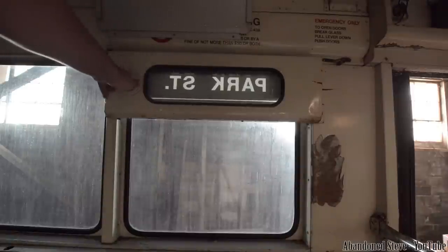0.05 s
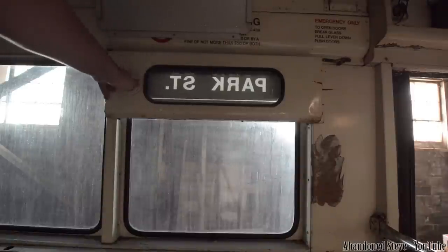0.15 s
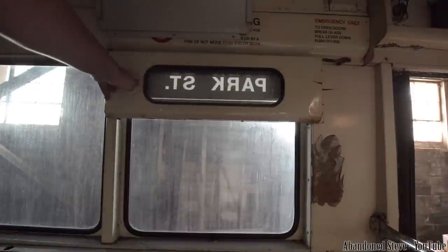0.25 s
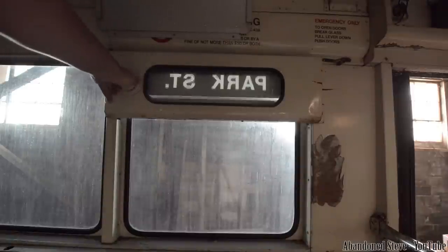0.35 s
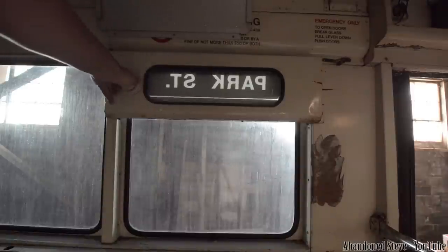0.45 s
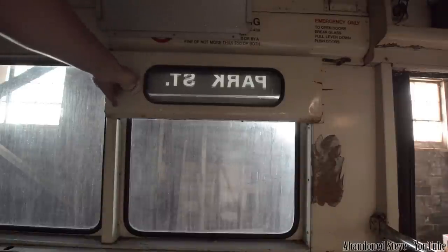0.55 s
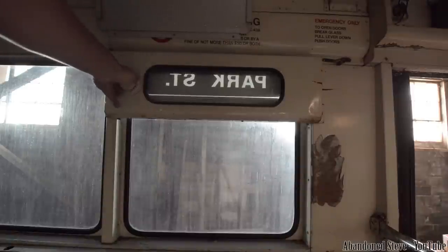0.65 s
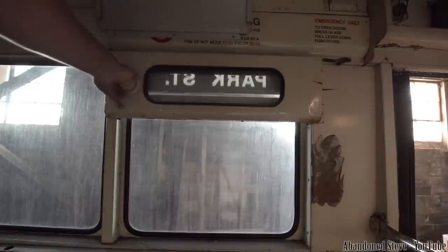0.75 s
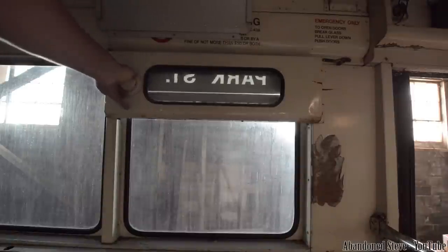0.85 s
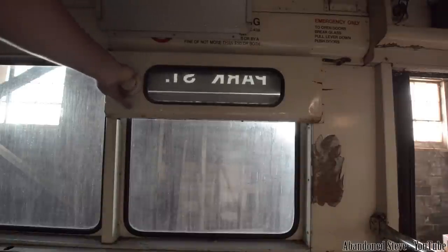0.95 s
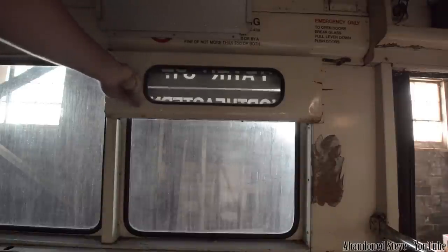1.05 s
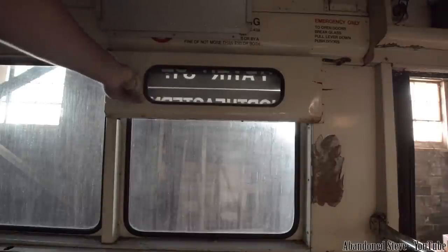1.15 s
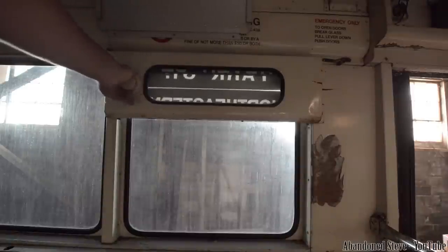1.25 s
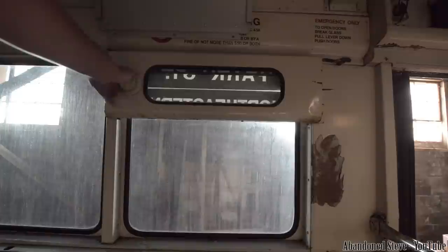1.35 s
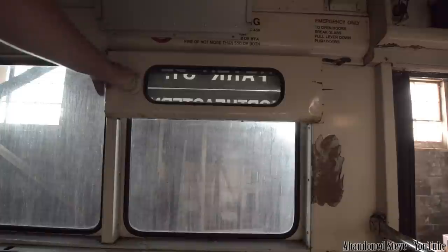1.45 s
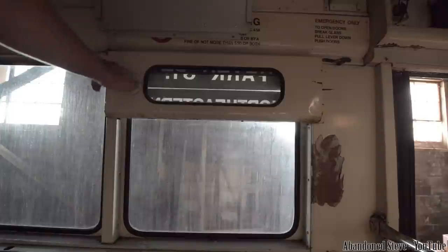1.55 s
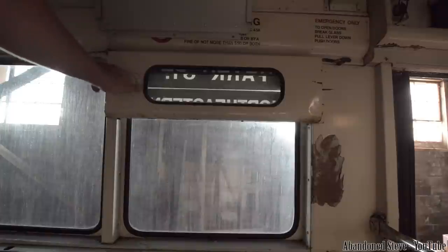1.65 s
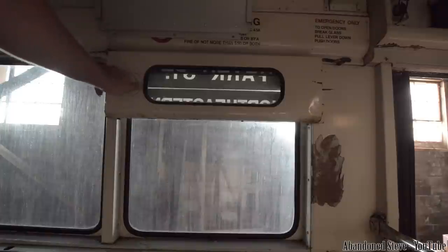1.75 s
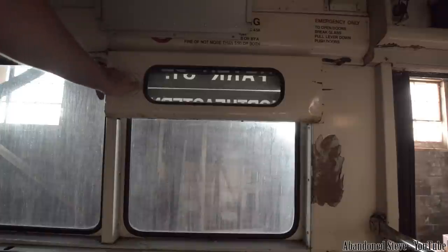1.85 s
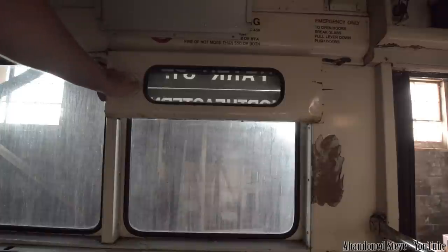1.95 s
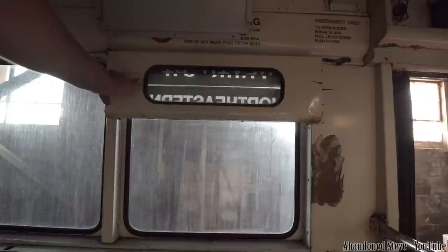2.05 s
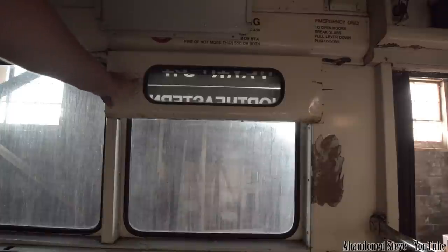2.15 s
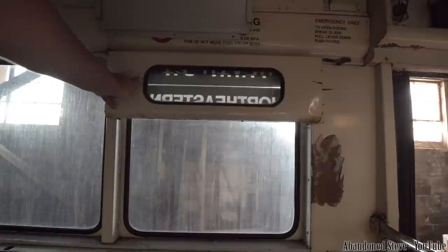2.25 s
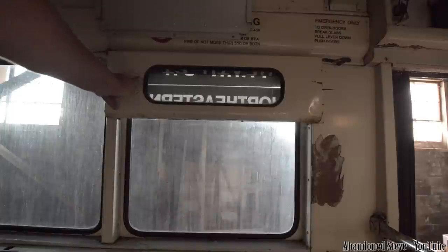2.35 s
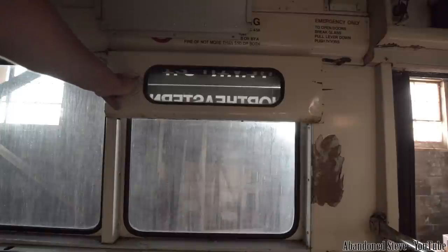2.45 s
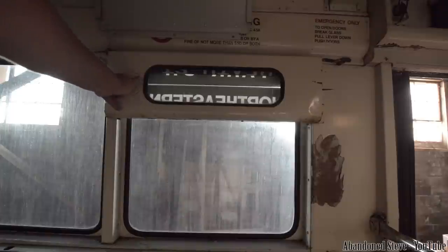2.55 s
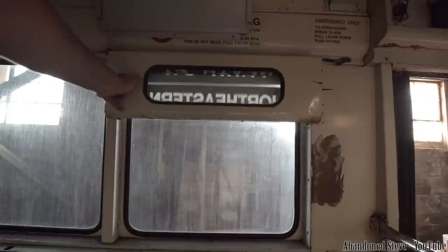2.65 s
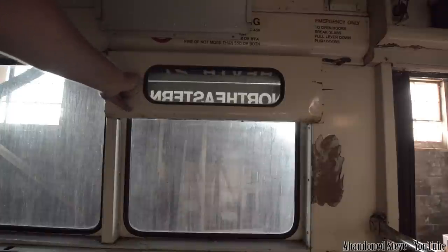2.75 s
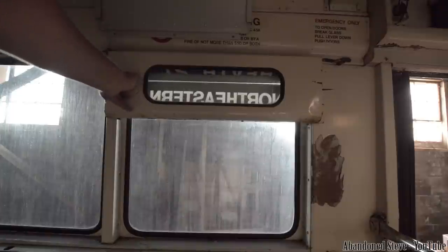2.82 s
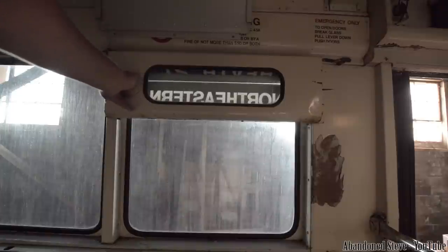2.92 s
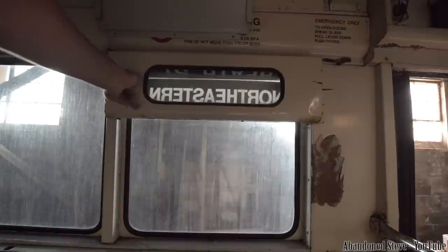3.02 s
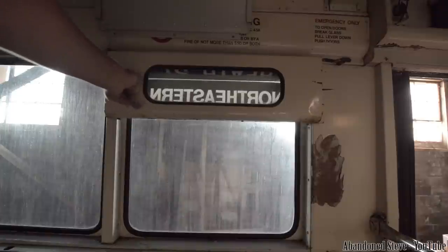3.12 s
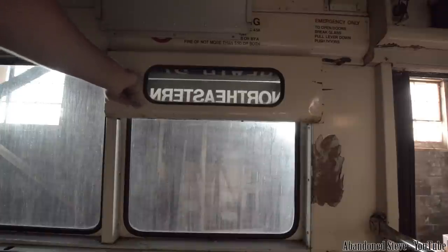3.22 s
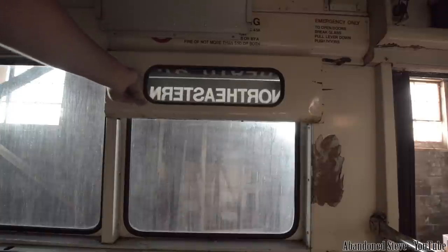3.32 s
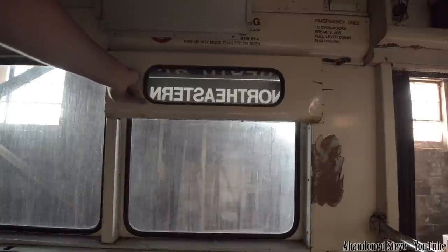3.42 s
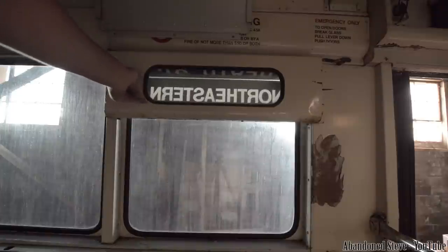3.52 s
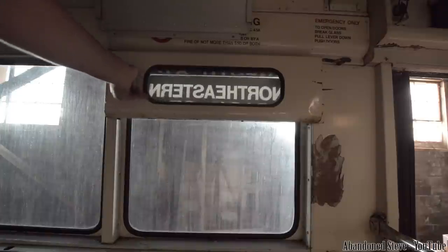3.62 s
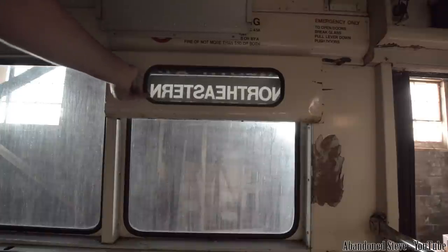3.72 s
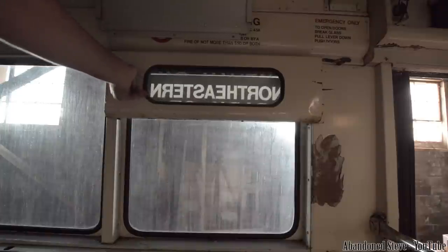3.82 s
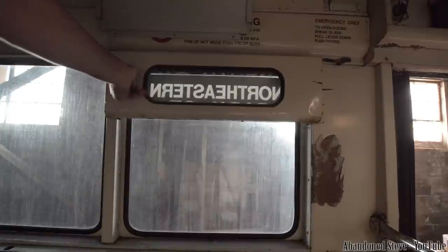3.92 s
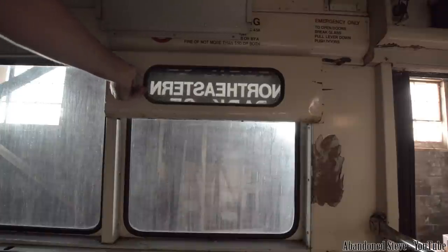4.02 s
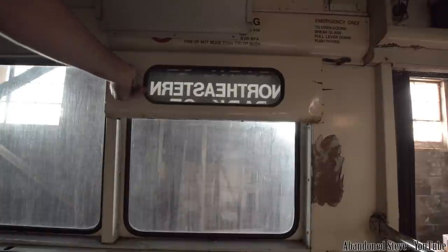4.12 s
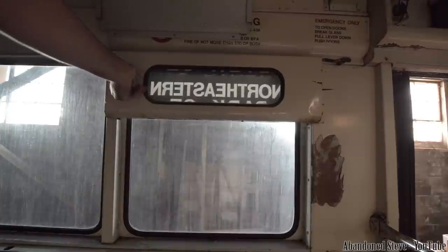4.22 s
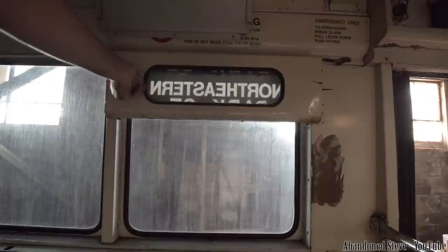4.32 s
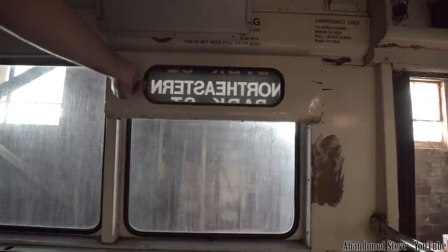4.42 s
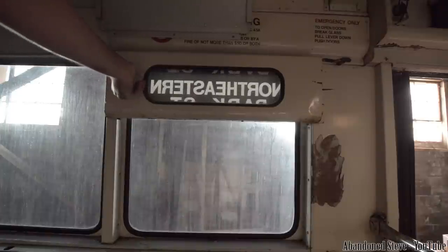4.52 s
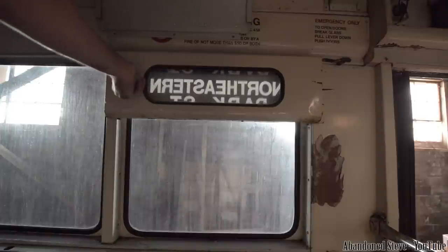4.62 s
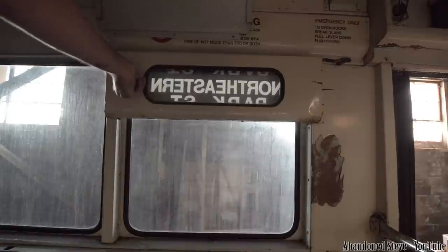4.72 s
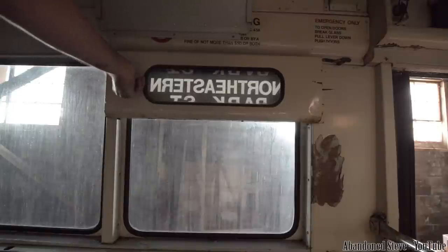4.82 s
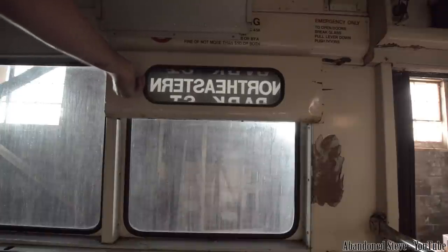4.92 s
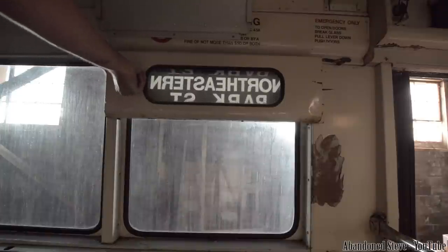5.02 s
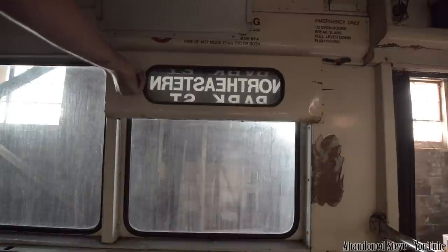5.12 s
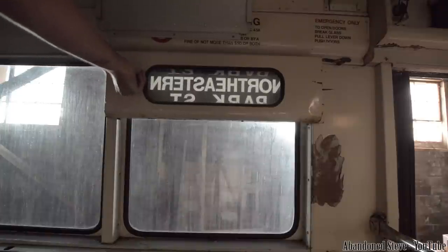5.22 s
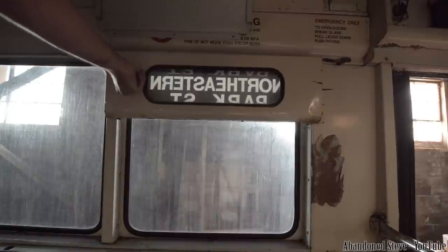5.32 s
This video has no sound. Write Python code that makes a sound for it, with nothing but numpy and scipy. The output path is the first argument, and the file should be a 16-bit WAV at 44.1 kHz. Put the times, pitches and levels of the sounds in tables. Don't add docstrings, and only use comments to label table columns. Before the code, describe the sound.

Sharp, irregular metallic clunks of a hand-cranked ratchet in a sheet-metal box, ringing briefly inside a hard, empty streetcar over a low hush.

```python
import sys
import numpy as np
from scipy import signal
from scipy.fft import rfft, irfft
from scipy.io import wavfile

SR = 44100
rng = np.random.default_rng(int(sys.argv[2]) if len(sys.argv) > 2 else 0)


def how_loud(loudness_db):
    steps = np.asarray(loudness_db, float) / 20
    return 10 ** steps


def inscribe(sig):
    pcm = np.round(np.clip(np.atleast_2d(sig).T, -1, 1) * 32767)
    wavfile.write(sys.argv[1], SR, pcm.astype(np.int16))


N = 236684
LEAD = SR // 2
SPOTS = 3


def at_hz(points, hz):
    points = np.array(points)
    return np.interp(np.log(hz), np.log(points[:, 0]), points[:, 1])


def band(x, low_hz, high_hz):
    sos = signal.butter(2, [low_hz, min(high_hz, 0.45 * SR)], "band", fs=SR, output="sos")
    return signal.sosfilt(sos, x)


def resonance(x, hz, r, height):
    height = height * (1 - r * r) / 2
    poles = [1, -2 * r * np.cos(2 * np.pi * hz / SR), r * r]
    return signal.lfilter([height, 0, -height], poles, x + 1e-18)


def diffuse(size, spectrum, t60s=None):
    # f/Hz, share [0-1]
    likeness = [(80, 0.95), (500, 0.73), (2000, 0.8), (5000, 0.51), (14000, 0)]
    corners_hz = 25 * 2 ** np.arange(0, 9.6, 0.5)
    white = rng.standard_normal((2, 2, size))
    s = np.arange(size) / SR
    out = 0
    for k, (low_hz, high_hz) in enumerate(zip(corners_hz, corners_hz[1:])):
        hz = np.sqrt(low_hz * high_hz)
        fall = how_loud(-60 * s / at_hz(t60s, hz)) if t60s else 1
        mid, side = band(white[k % 2] * fall, low_hz, high_hz)
        alike = np.clip(at_hz(likeness, hz), 0, 1)
        stereo = np.sqrt(1 + alike) * mid + np.sqrt(1 - alike) * side * [[1], [-1]]
        out = out + how_loud(at_hz(spectrum, hz)) * stereo
    return out


def background():
    # f/Hz, level/dB
    hush_curve = [(15, -58), (25, -13.5), (113, -1), (274, -10.5), (433, -15), (552, -29.5), (970, -24.5),
                  (3930, -35.5), (6730, -41.5), (9550, -39.5), (10600, -38.5), (13900, -50), (15500, -78.5)]
    # start/s, length/s, level/dB
    scuff_strokes = [
        (1.644, 0.061, -64),
        (1.8, 0.015, -65),
        (1.996, 0.057, -65),
    ]
    hush_db, scuff_bed_db, edge_s = -51, -88, 0.01

    hush = diffuse(N + LEAD, hush_curve)[:, LEAD:]
    s = np.arange(N) / SR
    strokes = how_loud(scuff_bed_db)
    for start_s, length_s, level_db in scuff_strokes:
        inside_s = np.minimum(s - start_s, start_s + length_s - s)
        strokes = strokes + how_loud(level_db) * np.clip(inside_s / edge_s + 1, 0, 1) ** 2
    scuff = band(rng.standard_normal(N) * strokes, 4300, 10000)
    return how_loud(hush_db) * hush / hush.std() + scuff


def car(x):
    # f/Hz, t60/s
    car_curve = [(80, -48.5), (250, -38.5), (800, -40), (2500, -39.5), (6000, -40), (10000, -44),
                 (15000, -39.5)]
    car_t60 = [(60, 1), (160, 0.47), (420, 0.57), (1100, 0.63), (3000, 0.55), (8000, 0.48), (15000, 0.32)]
    # f/Hz, t60/s
    shudder_curve = [(80, -33), (250, -32.5), (800, -36), (2500, -29), (6000, -30), (15000, -34.5)]
    shudder_t60 = [(80, 0.38), (500, 0.16), (3000, 0.069), (15000, 0.047)]

    size = 3 * SR // 4
    short = size // 3
    s = np.arange(size) / SR
    answer = diffuse(size, car_curve, car_t60) * (1 - np.exp(-s / 0.0041))
    shudder = diffuse(short, shudder_curve, shudder_t60)
    answer[:, :short] += shudder * (1 - np.exp(-s[:short] / 0.00075))
    return signal.fftconvolve(x[None], answer, axes=1)[:, LEAD:LEAD + N]


def direct(x):
    scatter_db, scatter_hz, scatter_ms = -21, 4970, 1.5
    ms = 1000 * np.arange(500) / SR
    scatter = band(rng.standard_normal(500) * np.exp(-ms / scatter_ms), scatter_hz, 15000)
    side = how_loud(scatter_db) * signal.fftconvolve(x, scatter)[:N]
    return np.array([x + side, x - side])


def damped_tones(rows, t60s, rise_s):
    s = np.arange(SR // 2) / SR
    out = np.zeros(2 * N)
    for (at_s, peak_db, hz), turn in zip(rows, rng.random(len(rows))):
        fall = how_loud(peak_db - 60 * s / max(at_hz(t60s, hz), 0.02))
        swell = (1 - np.exp(-s / rise_s)) ** 2 * fall
        at = LEAD + round(at_s * SR)
        out[at:at + len(s)] += swell * np.sin(2 * np.pi * (hz * s + turn))
    return out[:LEAD + N]


def wall_flexes():
    # t/s, peak/dB, f/Hz
    flex_rows = [(0.375, -9.5, 327), (0.424, -21, 311), (0.568, -9, 209.6), (0.797, -36, 88.5),
                 (0.797, -11, 268), (0.953, -24, 122), (1.044, -10.5, 342.7), (1.292, -12, 149),
                 (1.344, -14, 122.7), (1.799, -24.5, 139), (2.031, -24, 249), (2.048, -11.5, 334),
                 (2.213, -19, 459), (2.213, -13.5, 329), (2.685, -7, 163), (2.722, -11.5, 298),
                 (3.034, -9, 111), (3.09, -16.5, 125), (3.265, -19.5, 347), (3.284, -9.5, 336.5),
                 (3.6, -12, 332), (3.786, -13.5, 171), (3.832, -17, 147), (3.989, -19.5, 112),
                 (4.01, -5, 169), (4.369, -28, 88), (4.367, -9, 256), (4.65, -9, 172), (5.003, -11.5, 336)]
    # f/Hz, t60/s
    flex_t60 = [(100, 0.1), (170, 0.13), (340, 0.16)]
    return damped_tones(flex_rows, flex_t60, 0.0037)


def panel_clanks():
    # t/s, peak/dB, f/Hz
    clank_rows = [(-0.13, -19, 608), (0.376, -14, 1990), (0.572, -20, 505), (0.777, -13, 791),
                  (0.801, -9, 1290), (0.799, -16, 5000), (1.039, -17.5, 932), (1.061, -17.5, 927),
                  (1.343, -25, 1190), (1.799, -35, 780), (1.799, -42, 1196), (2.047, -19.5, 1295),
                  (2.047, -14.5, 1734), (2.209, -22, 1320), (2.686, -21, 976), (2.721, -6, 1319),
                  (2.721, -13, 2150), (3.026, -16, 1463), (3.282, -15, 800), (3.598, -22, 1325),
                  (3.94, -40, 2130), (4.007, -11.5, 1344), (4.007, -16.5, 2084), (4.366, -16, 1960),
                  (4.657, -11.5, 1319), (5.003, -16.5, 1157), (5.004, -21, 441.3), (5.254, -37, 810),
                  (5.36, -34.5, 598)]
    # f/Hz, t60/s
    clank_t60 = [(440, 0.32), (600, 0.25), (800, 0.069), (1300, 0.092), (2000, 0.047), (5000, 0.04)]
    return damped_tones(clank_rows, clank_t60, 0.00069)


def sign_box(force):
    # f/Hz, height over the bare blow/dB, t60/s
    panel_modes = [(88, 0, 1), (114.5, 9.5, 0.45), (147.4, 3, 0.083), (168.1, 8, 0.35), (226, -6, 0.27),
                   (235.2, 3, 0.21), (310, 5, 0.1), (315, 4.5, 0.58), (336, 3.5, 0.1), (442, 5.5, 0.32),
                   (582, 4, 0.46), (604, 6.5, 0.33), (798, 6, 0.2), (948, 5, 0.3)]
    # f/Hz, height over the bare blow/dB, t60/s
    gear_modes = [(1190, 4, 0.49), (1315, 6, 0.18), (1453, 6, 0.085), (1746, 4, .2), (1990, 4.5, 0.4),
                  (2085, 4.5, 0.44), (2170, 4.5, .25), (2900, 5.5, 0.4), (3620, 4.5, 0.2),
                  (4030, 8.5, 0.22), (4500, 7, .3), (5050, 6.5, .2), (5340, 6.5, 0.35), (5790, 9.5, 0.38)]
    out = np.zeros(force.shape)
    for k, (hz, level_db, t60) in enumerate(panel_modes + gear_modes):
        r = how_loud(-60 / (t60 * SR))
        out += resonance(force, hz, r, (-1) ** k * how_loud(level_db))
    return how_loud(1.5) * out


def housing(x):
    # f/Hz, width/Hz, level/dB
    housing_modes = [(162, 170, 4), (322, 122, 5), (383, 42, -5), (805, 42, 1.5), (949, 76, 3.5),
                     (1065, 140, -0.5), (1310, 72, 6.5), (1737, 36, 4.5), (2082, 250, 4), (2700, 590, -0.5),
                     (2990, 420, 3), (4050, 490, 4.5), (5220, 1200, 4), (7800, 210, 0)]
    for hz, width_hz, level_db in housing_modes:
        r = np.exp(-np.pi * width_hz / SR)
        x = x + resonance(x, hz, r, how_loud(level_db) - 1)
    return signal.sosfilt(signal.butter(4, 72, "high", fs=SR, output="sos"), x)


def contacts():
    # t/s, level/dB, hardness/dB, gap/ms, second over first/dB
    notch_blows = [(0.371, -12, -0.5, 6.67, -1), (0.564, -16.5, -1.5, 6.2, 4), (0.775, -14, 1, 5.3, -2.5),
                   (0.797, -10, 1.5, 4.9, 0.5), (1.036, -11, -2, 3.94, -3), (1.053, -13, 0.5, 8.64, -1.5),
                   (1.069, -17, 2, 7.5, -13), (1.287, -22, -8, 8.4, -0.5), (1.343, -22, -8, 5, -12),
                   (2.044, -12, 1.5, 3.7, -8), (2.208, -14.5, 0, 13, -15), (2.683, -13, 0.5, 2.9, -2.5),
                   (2.719, -7.5, 2, 6.36, -7.5), (3.023, -13, 0, 4.16, -1.5), (3.279, -13.5, -0.5, 7, -4),
                   (3.595, -13, 0, 7.6, -0.5), (3.763, -22, 1, 13, -6.5), (4.004, -15, 0, 3.94, 4),
                   (4.363, -13, 0, 5.4, 0.5), (4.654, -18, 0, 4.6, 6.5), (5.002, -14, 2, 5.25, -11)]
    # t/s, level/dB, hardness/dB
    slack_ticks = [(0.354, -29, 3.5), (0.548, -34, 2.5), (0.552, -24, 6.5), (0.764, -20.5, 1),
                   (1.029, -26, -2.5), (2.032, -25, 1), (2.18, -31, -4), (2.664, -39.5, -5),
                   (2.672, -25.5, 2), (3.006, -29, -7), (3.256, -30.5, 3), (3.261, -24, -1),
                   (3.267, -25, 3), (3.576, -29.5, 2.5), (3.583, -19, 3.5), (3.743, -32, -15),
                   (3.756, -23, -6), (3.988, -25.5, 1.5), (4.343, -28, -10), (4.351, -36, 5),
                   (4.639, -26.5, -4), (4.643, -21.5, -4), (4.986, -25.5, -5), (5.36, -35.5, -7)]
    # t/s, level/dB, hardness/dB
    late_bounces = [(0.432, -34, -8), (0.856, -31, -4), (1.714, -54, -16), (1.749, -60, -8),
                    (1.797, -44, -24), (1.806, -41, -7), (1.958, -49, -1), (2.263, -30.5, -5),
                    (2.776, -48, 12), (3.099, -41, 6), (3.319, -25, 1), (3.629, -25.5, -11),
                    (3.797, -30.5, -12), (3.836, -35, -4), (3.94, -39, -6), (4.056, -29.5, 4),
                    (5.068, -33, -8), (5.253, -45, 1)]
    # boom, thud, clank, crack, sizzle [dB over its level]
    first_colour = (-6, -4.5, 0, -2, -8.5)
    second_colour = (-13.5, -1.5, -1.5, 2.5, -6.5)
    third_colour = (-9, -12.5, -7.5, -13.5, -28.5)
    tick_colour = (-5.5, 1, 0.5, -6, -18.5)
    bounce_colour = (0.5, 3.5, -5, -7.5, -25.5)
    # boom, thud, clank, crack, sizzle [dB per dB of hardness]
    hardness_tilt = (-0.024, -0.32, 0.19, 1.3, 1.72)

    touches = [(-0.13, -12, 0, second_colour)]
    for s, level_db, hard_db, gap_ms, second_db in notch_blows:
        gap_s = gap_ms / 1000
        again_db = level_db + second_db
        touches.append((s, level_db, hard_db, first_colour))
        touches.append((s + gap_s, again_db, hard_db, second_colour))
        touches.append((s + 2 * gap_s, again_db, hard_db, third_colour))
    touches += [(*row, tick_colour) for row in slack_ticks]
    touches += [(*row, bounce_colour) for row in late_bounces]

    rows = []
    for s, level_db, hard_db, colour in touches:
        levels_db = level_db + np.array(colour) + hard_db * np.array(hardness_tilt)
        rows.append((s, *levels_db))
    return rows


def blows():
    # low/Hz, high/Hz, gain/dB, rise/ms, decay/ms
    blow_parts = [
        (78.1, 256, -2, 3.04, 15.4),
        (251, 867, -1, 2, 9.33),
        (818, 2750, 2, 0.55, 3.55),
        (2770, 9670, 1, 0.13, 2.57),
        (7900, 16900, 3.5, 0.14, 2.2),
    ]
    rows = contacts()
    size = 4000
    ms = 1000 * np.arange(size) / SR
    tap = np.eye(1, size)[0]
    chatter, push = np.zeros((2, SPOTS, LEAD + N + size))
    jumps_db = 3.9 * rng.standard_normal((len(rows), size // 20))
    grit = rng.standard_normal((len(rows), size)) * how_loud(jumps_db).repeat(20, axis=1)
    for part, (low_hz, high_hz, gain_db, rise_ms, decay_ms) in enumerate(blow_parts):
        shape = (1 - np.exp(-ms / rise_ms)) * np.exp(-ms / decay_ms)
        bursts = band(grit * shape, low_hz, high_hz)
        click = band(tap, low_hz, high_hz)
        click = (-1) ** part * click / np.linalg.norm(click)
        for k, (row, burst) in enumerate(zip(rows, bursts)):
            energy = how_loud(row[1 + part] + gain_db) * np.linalg.norm(shape)
            at = LEAD + round(row[0] * SR)
            chatter[k % SPOTS, at:at + size] += energy * burst / np.linalg.norm(burst)
            push[k % SPOTS, at:at + size] += energy * click
    return chatter[:, :LEAD + N], push[:, :LEAD + N]


def scene():
    chatter, push = housing(np.array(blows()))
    ring = sign_box(chatter)
    clanks = panel_clanks()
    into_car = push + 0.44 * ring + how_loud(-10) * clanks
    tails = sum(car(spot) for spot in into_car)
    near = (chatter + ring).sum(axis=0) + clanks + wall_flexes()
    return how_loud(-2.0) * (direct(near[LEAD:]) + tails) + background()


def roll_off(x):
    return signal.sosfilt(signal.butter(12, 16580, fs=SR, output="sos"), x)


def record(dry):
    # f/Hz, left over right/dB
    left_lean = [(60, 5), (110, 4), (200, 3.5), (380, 2.0), (700, 1), (1290, 2.5), (2380, 2), (4400, 2.0),
                 (8120, 3.5), (15000, 1.5)]
    lean = how_loud(at_hz(left_lean, np.fft.rfftfreq(N, 1 / SR) + 1e-9) / 2)
    x = irfft(rfft(dry) * [lean, 1 / lean], N)
    x = np.clip(x, -1, 1)
    x = signal.sosfilt(signal.butter(12, 15700, fs=SR, output="sos"), x)
    return roll_off(x)


dry = scene()
out = record(dry)
inscribe(out)
```